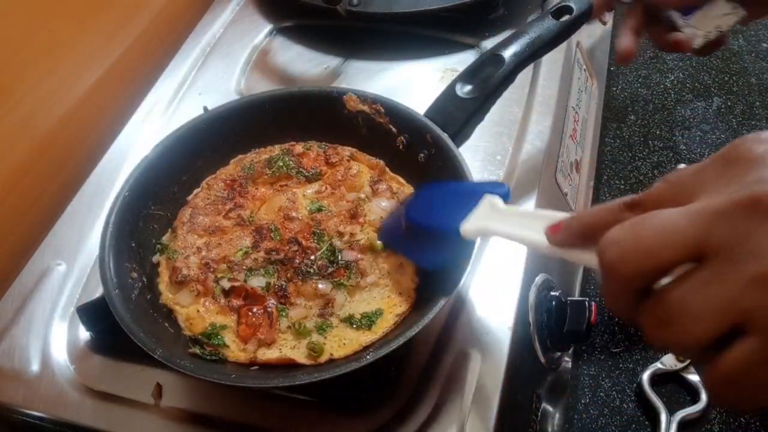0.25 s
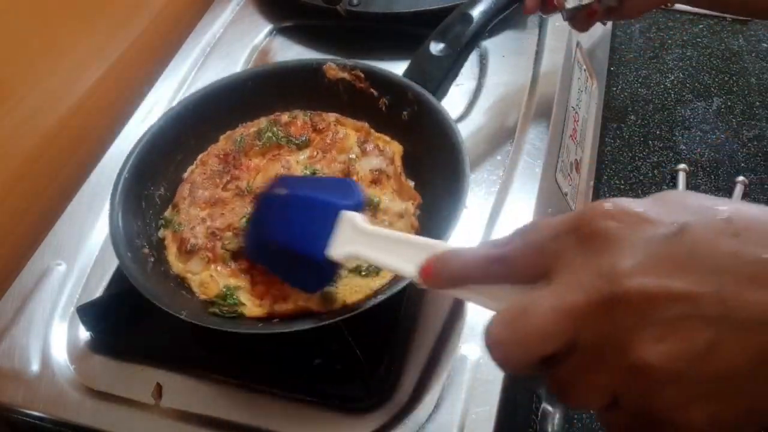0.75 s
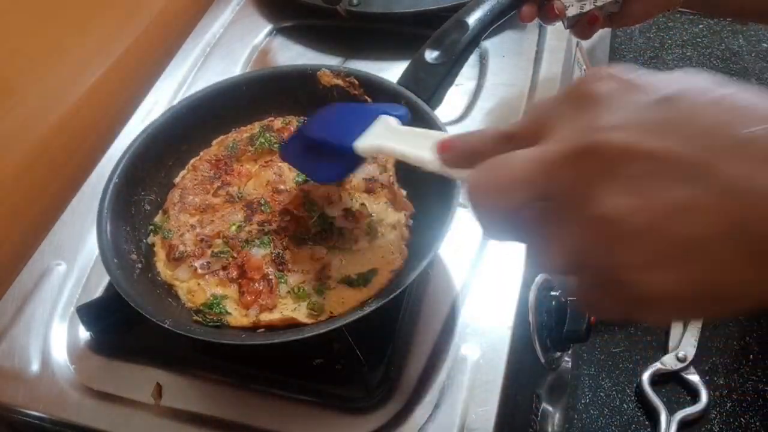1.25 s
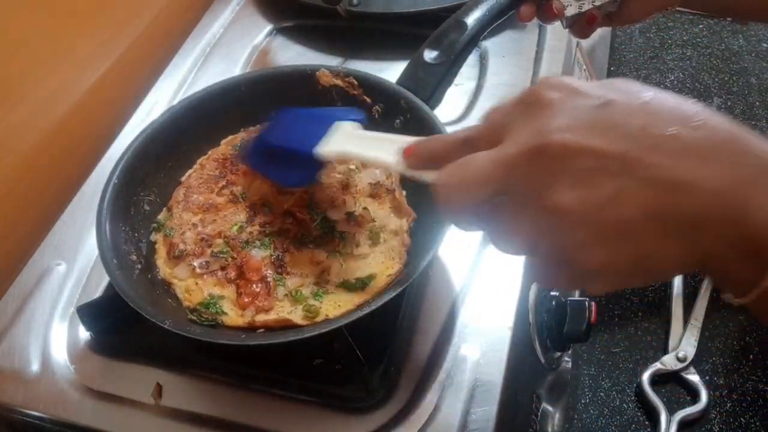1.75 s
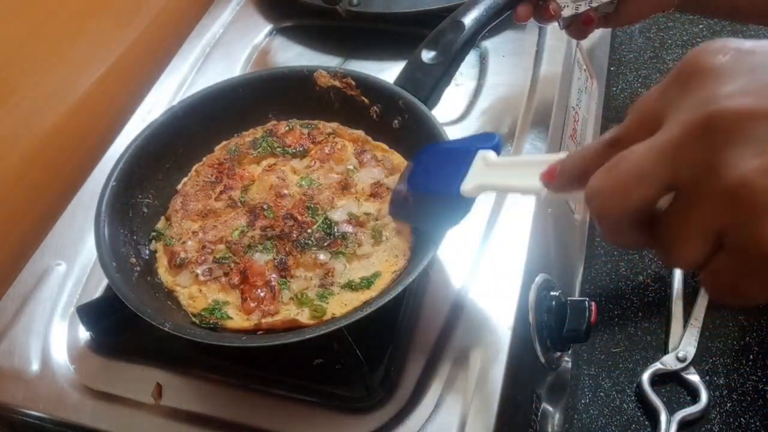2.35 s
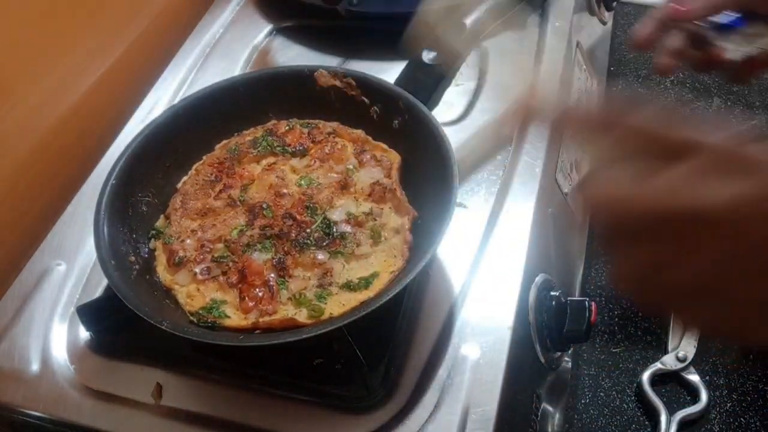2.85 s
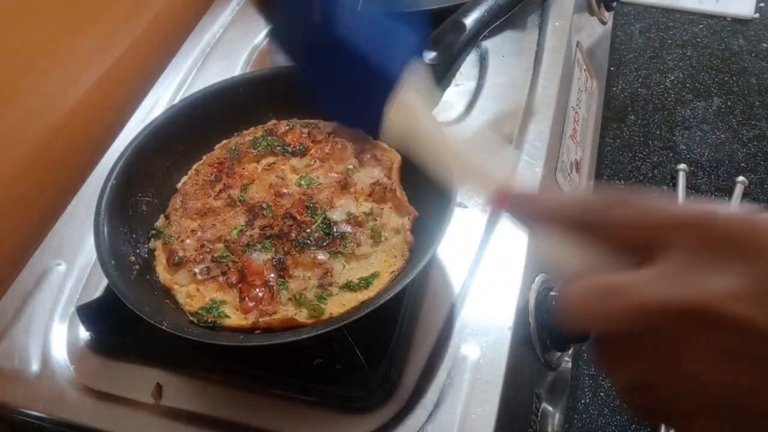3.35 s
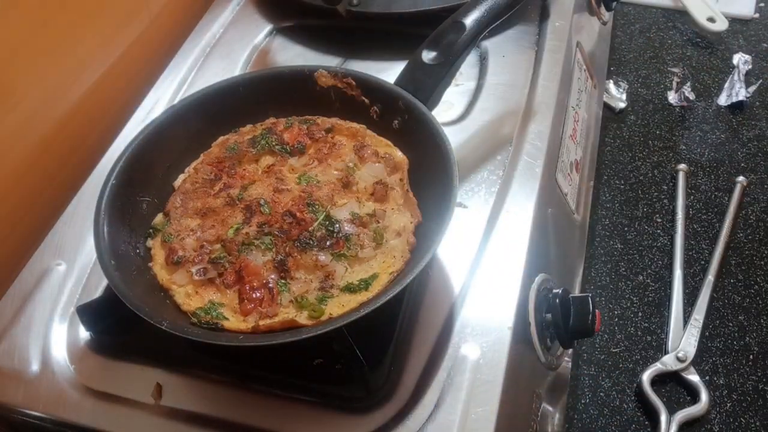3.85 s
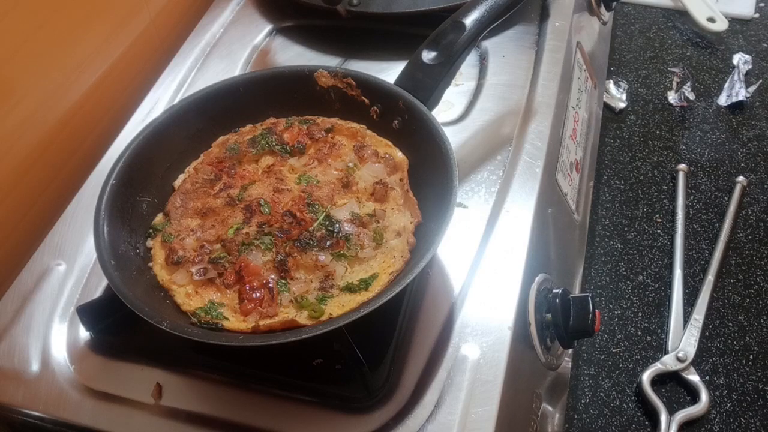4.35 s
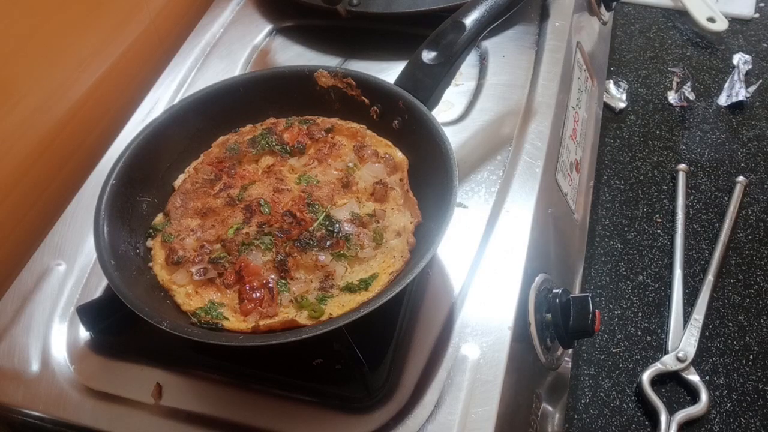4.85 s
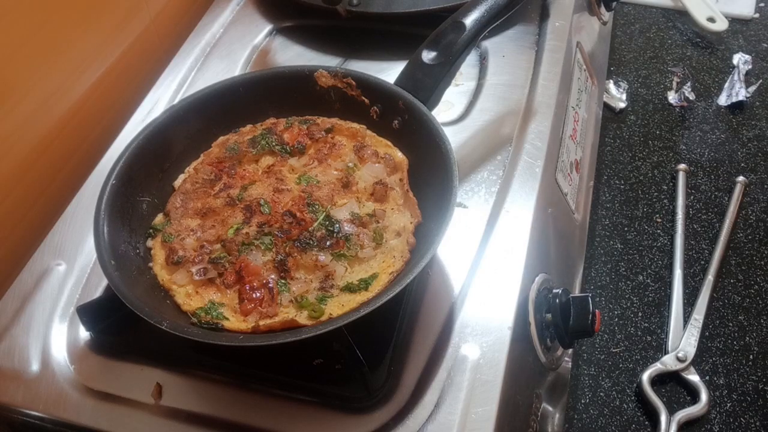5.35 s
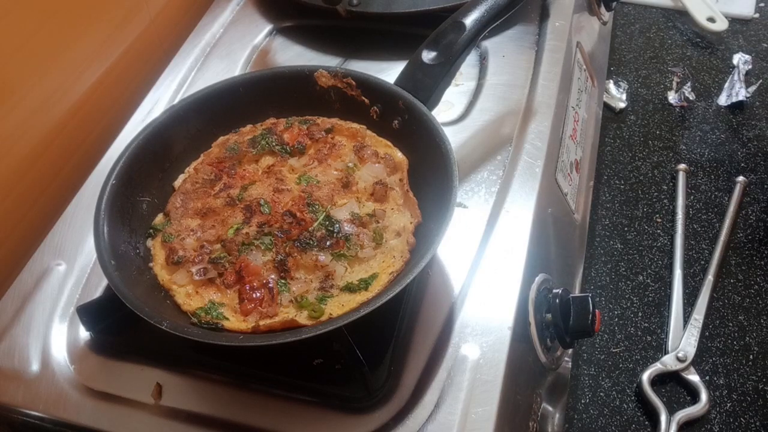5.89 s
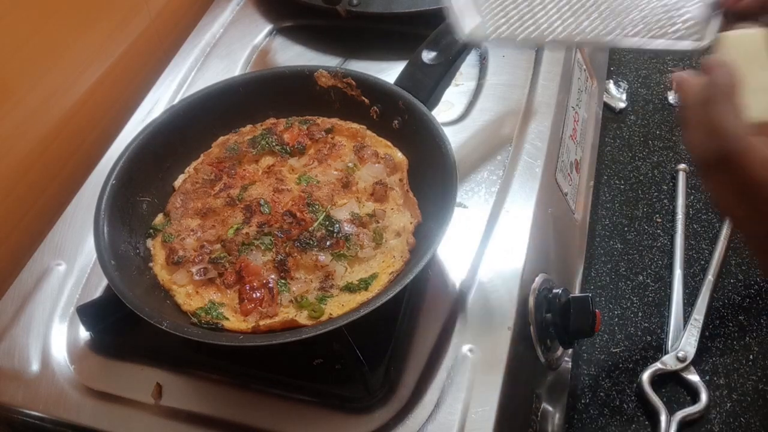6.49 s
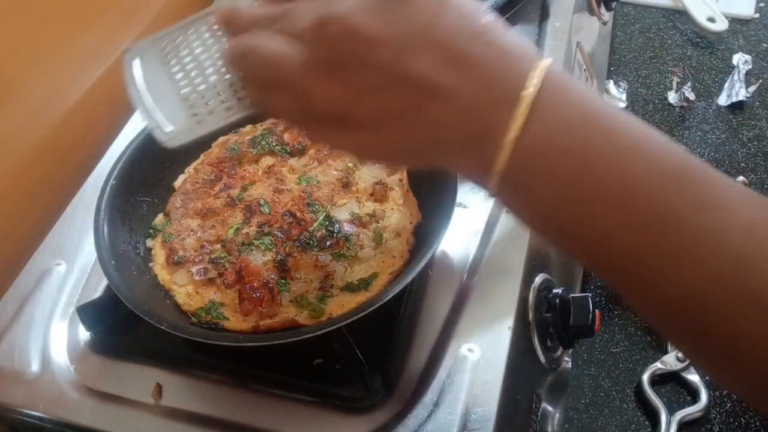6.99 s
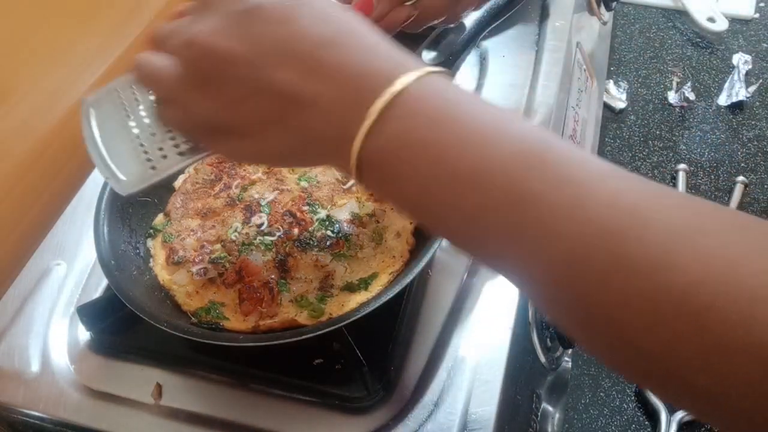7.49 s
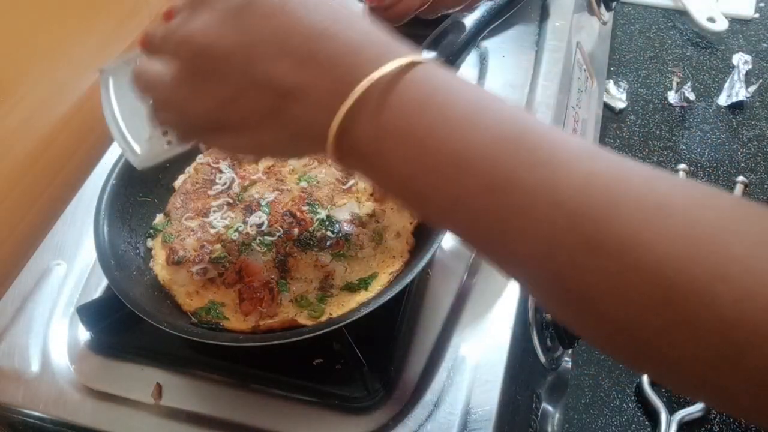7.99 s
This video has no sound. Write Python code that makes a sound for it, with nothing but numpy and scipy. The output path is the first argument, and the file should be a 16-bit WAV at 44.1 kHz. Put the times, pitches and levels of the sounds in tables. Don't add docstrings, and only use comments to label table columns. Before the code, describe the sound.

Soft spatula pats on a pan amid crackling foil, then a drawer scrapes open, cutlery clatters, it thuds shut, and cheese is faintly grated.

```python
import sys
import numpy as np
from scipy import signal
from scipy.fft import rfft, irfft, next_fast_len
from scipy.io import wavfile
from scipy.ndimage import uniform_filter1d

SR = 44100
rng = np.random.default_rng(int(sys.argv[2]) if len(sys.argv) > 2 else 0)


def ratio_of_db(decibels):
    return 10 ** (np.asarray(decibels, float) / 20)


def file_out(sig):
    cols = np.atleast_2d(sig).T
    lim = np.clip(cols, -1, 1)
    pcm = np.round(lim * 32767).astype(np.int16)
    wavfile.write(sys.argv[1], SR, pcm)


N = 362943

# start in seconds, thud in dB, pan ring against it in dB,
# slap against it in dB, t60 in seconds.
PATS = [(0.0, -49, -10.5, 1, 0.12), (0.109, -36.5, 2, 7.5, 0.19), (0.185, -43, -2.5, -9, 0.28),
        (0.256, -35.5, -4, -27, 0.14), (0.448, -27.5, 0.5, 11.5, 0.1), (0.475, -36, 0.5, -7, 0.21),
        (0.579, -53.5, 17, 2, 0.045), (0.657, -30.5, -1.5, -7, 0.19), (0.718, -40.5, 6.5, -6, 0.1),
        (0.829, -63, 14, -20, 0.176), (1.408, -43, 7, 1.5, 0.16), (1.509, -33, 3, 4, 0.13),
        (1.654, -38, 5.5, -7, 0.13), (1.769, -32, 1.5, 2.5, 0.14), (1.876, -47, 0, -17, 0.17),
        (2.704, -43, -6.5, -34, 0.15)]
# frequency in Hz, width in Hz.
PAN_MODES = [(225, 16), (770, 25), (900, 30), (1180, 63), (1330, 19), (1790, 160), (1960, 43), (2300, 200),
             (2760, 41), (3190, 730)]
# frequency in Hz, density in dB per Hz.
PAT_COLOUR = [(35, -63), (60, -30), (225, -0.5), (509, -10), (955, -1.5), (1180, 0.5), (2260, -22),
              (3300, -20.5), (4000, -26.5), (6440, -28), (9000, -40), (11700, -89)]


def spatula_pats():
    out = np.zeros(N)
    t = np.arange(SR // 3) / SR
    for s, db, mid_db, slap_db, t60 in PATS:
        modes = [(hz * rng.uniform(0.9, 1.04), width) for hz, width in PAN_MODES]
        blow = signal.oaconvolve(rng.standard_normal(len(t)), body(PAT_COLOUR, modes, lift_db=6.0))[:len(t)]
        low, mid, high = (evened(part) for part in bands(blow, (600, 2000)))
        rise_s = np.clip(0.003 * ratio_of_db(-slap_db), .001, .012)
        thud = low * ratio_of_db(-60 * t / (1.53 * t60)) * np.minimum(t / (rise_s + 0.0099), 1)
        slap = mid * ratio_of_db(mid_db - 60 * t / t60) + high * ratio_of_db(slap_db - 60 * t / (.5 * t60))
        add(out, s, ratio_of_db(db - 2.5) * (thud + slap * np.minimum(t / rise_s, 1)))
    return out


# peak in seconds, level in dB,
# 20 dB rise in seconds, 20 dB fall in seconds, lean in dB.
DRAGS = [
    (0.682, -41, 0.097, 0.17, 1.5),
    (4.39, -72.5, 0.013, 0.06, 27),
    (4.45, -53.5, 0.073, 0.057, 4.9),
]
# offset in dB, steepness as a factor, share of lean as a factor.
DRAG_LAW = [(-9.5, 0.58, 0.82), (-2, 0.93, 0), (-10.5, 1.7, 0.17)]
# frequency in Hz, density in dB per Hz.
DRAG_COLOUR = [(35, -73.5), (60, -17.5), (160, -15.5), (235, 9), (360, -4), (507, -14.5), (646, -0.5),
               (1190, -9.5), (1800, -32), (2340, -26.5), (3400, -32.5), (4400, -96.5)]


def spatula_drags():
    moves = gestures(DRAGS, DRAG_LAW, (.4, 1.1)) + gestures(DRAGS, DRAG_LAW, (3.8, 5.2))
    return friction(moves, body(DRAG_COLOUR), (500, 1600),
                    per_s=900, spread_db=2.5, hiss=1.2, patchy_db=2.5)


# peak in seconds, level in dB, 20 dB rise in seconds,
# 20 dB fall in seconds, lean in dB.
RUSTLE = [(0.36, -48, -0.93, 1.1, 7), (0.43, -55, -3, 1.55, 12), (1.46, -52.5, 0.66, 0.9, -2),
          (2.07, -53.5, 0.35, 0.4, 5.5), (2.31, -53.5, 0.75, 2, -3), (1.71, -62, -1.04, 1.4, 9.5),
          (3.44, -63.5, 3.5, -1, -9), (3.52, -61.5, 1.4, 1.05, -12), (3.59, -55.5, 0.22, -0.35, 8),
          (3.655, -55, 1.1, -0.24, -3.5), (6.61, -62, 0.3, 0.06, -2), (7.47, -66, 0.02, 1, -5)]
# offset in dB, steepness as a factor, share of lean as a factor.
RUSTLE_LAW = [(-5.5, 7.7, 0.73), (-1.5, 2.7, 0), (-7.5, 1.8, 0)]
# frequency in Hz, density in dB per Hz.
FOIL_COLOUR = [(530, -47.5), (900, -19.5), (1190, -26.5), (1290, -13.5), (1940, -15.5), (2890, -14),
               (3720, -11), (4560, -10.5), (5460, -2.5), (6000, 2.5), (6610, 10.5), (7920, -4), (9260, -19),
               (12800, -19), (15900, -16)]
# time in seconds, level in dB.
SIZZLE = [(0, -59.5), (0.2, -62), (0.7, -61.5), (1.0, -56.5), (2.7, -59.5), (3.0, -59), (3.35, -66),
          (3.66, -66), (3.74, -72.5), (4.4, -68), (5.4, -73.5), (6.4, -78), (7.5, -81.5)]
# offset at -60 dB in dB, share of the level change as a factor.
SIZZLE_BANDS = [(-5, 0.59), (-2.5, 1.1), (-6, 1.1)]
# peak in seconds, level in dB, 20 dB rise in seconds,
# 20 dB fall in seconds, lean in dB.
SWISH = [
    (1.1, -54.5, 0.089, 0.106, 0),
    (1.185, -41.5, 0.15, 0.25, 3.5),
    (1.26, -47, 0.063, 0.16, -5),
    (1.44, -48, 0.071, 0.15, 5.5),
    (2.46, -44.5, 0.1, 0.2, -4.5),
    (3.51, -51, 0.038, 0.13, -12),
    (6.61, -68, .06, 0.069, -1.5),
    (6.718, -59, 0.026, 0.044, -4.5),
]
# offset in dB, steepness as a factor, share of lean as a factor.
SWISH_LAW = [(-6, 2.7, 0.68), (-1, 2, 0.2), (-9.5, 1.5, 0.0036)]
# frequency in Hz, width in Hz.
FOIL_HUMPS = [(1070, 50), (2120, 110), (3400, 350), (5600, 630)]
# peak in seconds, level in dB, top against it in dB.
SNAPS = [(0.1558, -55.5, -11.5), (0.2099, -41, -10), (0.2214, -42, -11), (0.249, -42, -11),
         (0.2744, -36, -21), (0.3689, -24, -29), (0.419, -37, -8), (0.5477, -48, -26.5), (0.593, -34, -17),
         (0.6454, -34, -25), (0.75, -42, -22), (0.825, -42, -25), (0.8565, -46, -28), (0.88, -30.5, -15),
         (1.0545, -48, -17), (1.0983, -40, -15), (1.1357, -28, -17), (1.1568, -35, -22.5),
         (1.1823, -29, -24.5), (1.1994, -36, -19), (1.2206, -32, -18), (1.2551, -23.5, -26),
         (1.263, -20, -23), (1.285, -36, -14), (1.2943, -30, -11), (1.3468, -39.5, -19),
         (1.4544, -32.5, -20), (1.5449, -29, -27), (1.5893, -41, -23), (1.7055, -43.5, -11),
         (1.7419, -33, -13), (1.8961, -37, -24), (2.0522, -50, -14), (2.16, -42, -20.5), (2.2449, -23, -36),
         (2.2929, -38, -23), (2.3024, -36, -23), (2.3118, -33, -20), (2.3481, -36, -18), (2.4066, -31, -25),
         (2.448, -27, -16), (2.464, -33, -17.5), (2.4773, -34, -18), (2.491, -27, -24), (2.5203, -40, -29),
         (2.5807, -33, -27), (2.6284, -31.5, -27), (2.6719, -31.5, -7.5), (2.7138, -36.5, -26),
         (2.7841, -30, -30.5), (2.8698, -36.5, -17), (2.9053, -40.5, -6), (3.073, -42, -9),
         (3.2715, -47, -2), (3.2946, -40.5, -19), (3.4231, -52, -4), (3.437, -39, -14), (3.4874, -42.5, -2),
         (3.5064, -43, -4), (3.5824, -39, -11.5)]
# peak in seconds, level in dB, top against it in dB.
TICKS = [
    (4.324, -57.5, -3),
    (3.965, -58.5, -10.5),
    (6.707, -53, -16.5),
    (6.716, -46.5, -17),
    (6.732, -52.5, -15),
    (7.035, -61, -16),
]


def foil_wrapper():
    bed = friction(gestures(RUSTLE, RUSTLE_LAW, (0, 7.5), (SIZZLE, SIZZLE_BANDS)),
                   body(FOIL_COLOUR, HUM[4:], lift_db=-1.0), (4500, 9000),
                   per_s=1900, spread_db=3.4, hiss=.8, patchy_db=1.2)
    swish = friction(gestures(SWISH, SWISH_LAW, (0, 7.5)),
                     body(FOIL_COLOUR, FOIL_HUMPS, lift_db=10), (4500, 9000),
                     per_s=1500, spread_db=3.6, hiss=.9, patchy_db=2)
    grip = wander(N, 900, 900)
    crackle = flicker((bed + swish) * ratio_of_db(.8 * grip))
    return crackle + snaps(SNAPS + TICKS, FOIL_COLOUR, FOIL_HUMPS[1:], lift_db=4)


# peak in seconds, level in dB, 20 dB rise in seconds,
# 20 dB fall in seconds, lean in dB.
DRAWER = [(3.59, -49, 0.012, 0.15, -11), (3.915, -47.5, 0.019, 0.17, 2), (3.98, -39, 0.069, 0.26, 5),
          (4.085, -34.5, 0.2, 0.085, -4.5), (4.135, -39, 0.015, 0.092, 9.5), (4.19, -42.5, 0.05, 0.13, -1),
          (5.569, -31, 0.012, 0.2, 2.5), (5.64, -33.5, 0.076, 0.28, -3.5), (5.74, -31.5, 0.14, 0.16, 3),
          (5.83, -36, 0.097, .13, -1), (5.93, -39, 0.12, 0.11, -16.5), (5.985, -44.5, 0.032, 0.095, -1.5),
          (6.29, -58.5, 0.056, 0.045, -8)]
# offset in dB, steepness as a factor, share of lean as a factor.
DRAWER_LAW = [(-0.5, 1.4, 0.24), (-5, 1.262, 1)]
# frequency in Hz, density in dB per Hz.
DRAWER_COLOUR = [(24, -64.5), (40, -45.5), (83, -1), (140, -2.5), (180, -6), (297, -6.5), (541, -16),
                 (987, -17), (1180, -10.5), (1850, -22.5), (6620, -25), (9400, -49.5), (15900, -53.5)]
# frequency in Hz, width in Hz.
BOX_MODES = [(130, 71), (355, 40), (1176, 27), (2406, 44), (2750, 36), (3190, 33)]


def drawer_slide():
    opening = gestures(DRAWER, DRAWER_LAW + [(-22, 1.5, .5)], (3.5, 4.5))
    shutting = gestures(DRAWER, DRAWER_LAW + [(-15.5, 1.2, .8)], (5.4, 6.5))
    return friction(opening + shutting, body(DRAWER_COLOUR, BOX_MODES, lift_db=-4.5), (600, 3500, 11800),
                    per_s=1000, spread_db=3.0, hiss=1.33, patchy_db=3.0, air_db=-22.0)


# peak in seconds, level in dB, 20 dB rise in seconds,
# 20 dB fall in seconds, lean in dB.
CUTLERY = [(4.03, -49.5, 0.02, 0.134, -16), (4.092, -48.5, .009, 0.061, -25),
           (4.135, -38, 0.013, 0.11, -21.5), (4.487, -36.5, 0.0176, 0.124, 1.5),
           (4.556, -31.5, .012, 0.21, -5.5), (4.607, -30.5, 0.022, 0.32, -2),
           (4.71, -30, 0.0315, 0.067, -8), (4.792, -25, 0.016, 0.11, -7.5), (4.85, -26, 0.075, 0.099, -6),
           (4.902, -32.5, .05, 0.028, -6.5), (4.94, -47.5, 0.063, 0.11, -4.5)]
# offset in dB, steepness as a factor, share of lean as a factor.
CUTLERY_LAW = [(-3, 1, 0.73), (-0.1, 1, 1.13), (0.57, 0.96, 0.1)]
# frequency in Hz, density in dB per Hz.
CUTLERY_COLOUR = [(24, -48), (40, -33.5), (96, 3.5), (231, -5.5), (353, -3.5), (541, -8), (1060, -9),
                  (1240, -7.5), (1760, -12), (3370, -11), (4660, -13), (5690, -11), (7130, -11),
                  (9400, -31.5), (15900, -16)]
# frequency in Hz, width in Hz.
STEEL_MODES = [(353, 38), (1270, 14), (1906, 10), (2384, 14), (3004, 8.3), (3377, 21), (3837, 25),
               (4087, 21), (4400, 42), (4914, 21), (5344, 13), (5650, 66), (6156, 26), (6650, 48)]


def cutlery_clash():
    return friction(gestures(CUTLERY, CUTLERY_LAW, (3.8, 5.2)),
                    body(CUTLERY_COLOUR, STEEL_MODES, lift_db=9), (700, 3000, 11800),
                    per_s=2000, spread_db=1.5, hiss=1.08, patchy_db=2.0, air_db=-13.5)


# peak in seconds, level in dB, 20 dB rise in seconds,
# 20 dB fall in seconds, lean in dB.
NUDGES = [
    (5.165, -50, 0.038, 0.12, -18.5),
    (5.235, -65, 0.15, 0.16, 9),
]
# offset in dB, steepness as a factor, share of lean as a factor.
NUDGE_LAW = [(4, 1.4, 0), (-19, 1.7, 0.69), (-2, 1.4, 1), (1.5, 1.1, 0.46)]


def drawer_nudge():
    return friction(gestures(NUDGES, NUDGE_LAW, (5.1, 5.5)),
                    body(CUTLERY_COLOUR, STEEL_MODES[3:], lift_db=8), (250, 750, 3500, 9000),
                    per_s=900, spread_db=2.5, hiss=1.3, patchy_db=5, air_db=-25)


# start in seconds, level in dB, frequency in Hz, t60 in seconds.
KNOCKS = [(4.134, -42, 1160, 0.12), (4.477, -23.5, 869, 0.107), (4.707, -23, 3810, 0.11),
          (4.787, -20.5, 3373, 0.1), (4.819, -20, 5710, 0.1), (4.852, -20, 6180, 0.11),
          (4.552, -38.5, 14100, .12), (4.553, -41.5, 7100, .15), (4.554, -35, 9350, .06),
          (4.555, -47.5, 10100, 0.074), (4.556, -41, 11700, .07), (4.604, -26.5, 5900, .06),
          (4.64, -28, 1267, .2), (4.72, -28, 1260, 0.23), (4.79, -23.5, 1244, .12), (4.82, -20, 2366, .06),
          (4.875, -40, 11000, .1), (4.16, -35.5, 2850, 0.12)]
# start in seconds, level in dB, frequency in Hz, t60 in seconds.
BOOMS = [
    (3.991, -35, 348.7, 0.45),
    (4.131, -22, 360.5, 0.158),
    (4.071, -28, 140, 0.36),
    (4.602, -22.5, 347.4, 0.27),
    (5.153, -30, 140, 0.12),
    (5.561, -17.5, 357, 0.083),
    (5.726, -14, 144.5, 0.24),
    (5.799, -12, 114, 0.12),
    (5.88, -23, 136, 0.32),
]


def drawer_knocks(size=12000):
    out, t = np.zeros(N), np.arange(size) / SR
    for s, db, hz, t60 in KNOCKS + BOOMS:
        pair = np.sin(2 * np.pi * hz * t) + .4 * np.sin(2 * np.pi * hz * 1.04 * t)
        rise = np.minimum(t * hz / 6.9, 1)
        add(out, s, ratio_of_db(db - 1.0 - 60 * t / t60) * pair * rise)
    return out


# peak in seconds, level in dB, 20 dB rise in seconds,
# 20 dB fall in seconds, lean in dB.
GRATING = [
    (7.575, -59.5, 0.028, .15, -3.5),
    (7.64, -61.5, .1, .3, 0.5),
    (7.79, -61.5, 0.13, 0.24, -1.5),
    (7.85, -57.5, 0.047, 0.078, 9.5),
    (7.92, -64, 0.11, 0.44, -7),
    (8.01, -58.5, 0.25, 0.24, 0.5),
    (8.105, -52, 0.026, 0.24, 5.5),
    (8.19, -54, .2, .5, 2.5),
]
# offset in dB, steepness as a factor, share of lean as a factor.
GRATING_LAW = [(-4, 2.3, 0.8), (-4, 0.87, -0.53), (-7.5, 0.64, -0.51)]
# frequency in Hz, density in dB per Hz.
GRATING_COLOUR = [(410, -51), (700, -46), (958, -19), (1290, -25.5), (1640, -21), (2130, -26), (2520, -14),
                  (3730, -14), (6620, -1.5), (9430, -15), (14100, -12), (15900, -10.5)]
PLATE_HZ = [1710, 2200, 2816, 3180, 3455, 3810, 4180, 4600, 5150, 5300, 6000, 6400, 6850, 7700]
# peak in seconds, level in dB, top against it in dB.
CATCHES = [(7.4844, -47, -8.5), (7.5033, -45.5, -11), (7.5477, -56, -12), (7.5667, -35.5, -27),
           (7.5951, -40, -26), (7.6196, -51, -21.5), (7.6286, -39, -22), (7.6475, -47.5, -23.5),
           (7.6944, -46, -25), (7.7727, -44.5, -19), (7.8116, -39, -11), (7.8416, -28.5, -30.5),
           (7.8624, -44, -20.5), (7.894, -40, -23.5), (7.9054, -38, -25), (7.9234, -48, -13.5),
           (7.9453, -40, -21), (7.9758, -38, -23), (7.9814, -47, -16), (7.9912, -45, -9),
           (8.0052, -31.5, -15), (8.0551, -40.5, -17), (8.0691, -38, -14.5), (8.098, -27.5, -24),
           (8.1107, -33, -15.5), (8.1154, -37, -20), (8.1204, -42, -12), (8.1364, -32, -21),
           (8.1434, -29, -19), (8.1474, -31, -19), (8.1524, -40, -21), (8.1664, -34, -25),
           (8.1764, -38.5, -22.5), (8.1873, -37, -24.5), (8.2072, -32, -28.5), (8.2184, -29.5, -26.5)]


def grater():
    modes = [(hz, 40) for hz in PLATE_HZ]
    bed = friction(gestures(GRATING, GRATING_LAW, (7.4, 8.24)),
                   body(GRATING_COLOUR, modes, lift_db=15), (4500, 9000),
                   per_s=1000, spread_db=3.1, hiss=.6, patchy_db=2)
    return bed + snaps(CATCHES, GRATING_COLOUR, modes, lift_db=11.0)


# start in seconds, level in dB, frequency in Hz,
# length in seconds.
RINGS = [(0.011, -53, 2600, 0.069), (0.168, -52.5, 2600, 0.049), (0.286, -52, 2558, 0.052),
         (2.054, -62.5, 729.4, 0.053), (2.344, -57, 2820, 0.035), (2.365, -57, 242.6, 0.075),
         (3.753, -67, 679.6, 0.057), (5.035, -56, 2900, 0.073), (5.167, -57, 977.7, 0.048),
         (5.194, -57.5, 2810, 0.069), (5.01, -79.5, 4500, 0.087), (5.166, -57, 4500, .1),
         (5.25, -74, 3000, 0.15), (5.441, -68.5, 900, .04), (8.2, -67.5, 950, 0.028),
         (5.299, -67, 971.5, 0.063), (6.28, -66, 2176, 0.023), (6.291, -68.5, 2455, 0.03),
         (6.574, -67, 3455, 0.064), (6.596, -68.5, 3625, .06), (6.587, -66, 6393, .06),
         (6.61, -73, 5468, 0.067), (6.703, -69, 4653, .045), (6.71, -70, 5499, .025),
         (6.712, -67, 6500, 0.04), (6.871, -72, 2800, .06), (7.004, -71.5, 2800, .055),
         (7.209, -70, 5900, .035), (7.3, -71, 6500, .06), (7.03, -71, 7765, 0.022),
         (2.706, -50.5, 892.8, 0.039), (6.7, -71, 1293, 0.044), (7.261, -70.5, 3860, 0.07),
         (7.965, -70.5, 1048, 0.1)]


def faint_rings():
    out = np.zeros(N)
    for s, db, hz, length in RINGS:
        t = np.arange(0, length, 1 / SR)
        waver = wander(len(t), 300)
        phase = 2 * np.pi * np.cumsum(hz + (9 + .005 * hz) * waver) / SR
        tone = np.sin(phase) * ratio_of_db(1.5 * waver[::-1])
        add(out, s, ratio_of_db(db) * tone * signal.windows.tukey(len(t), .6))
    return out


# frequency in Hz, density in dB per Hz.
FLOOR_COLOUR = [(15, -40.5), (25, -15), (102, 2.5), (248, 1), (529, -7.5), (1290, -10), (5900, -19.5),
                (6520, -11.5), (7260, -25), (7880, -10.5), (9260, -25), (12500, -17), (15900, -28.5)]
# frequency in Hz, width in Hz.
HUM = [(6600, 219.7), (6900, 120), (286, 9.2), (1293, 12), (6900, 2000)]


def kitchen():
    hush = signal.oaconvolve(rng.standard_normal(N), body(FLOOR_COLOUR, HUM, lift_db=11))[:N]
    return ratio_of_db(-71) * evened(patches(hush, patchy_db=2.5))


def room(x, t60=0.16):
    t = np.arange(SR // 3) / SR
    echoes = rng.choice([-1., 1.], len(t)) * (rng.random(len(t)) < 2000 / SR)
    tail = echoes * ratio_of_db(-60 * t / t60) * (t > .004)
    return signal.oaconvolve(x, tail / np.linalg.norm(tail))[:N]


def gestures(rows, law, span, bed=None):
    t = np.arange(*span, .004)
    s, db, rise, fall, lean = np.transpose(rows)[:, :, None]
    down = 20 * np.maximum((s - t) / abs(rise), (t - s) / abs(fall)) ** 1.476
    power = np.array([ratio_of_db(2 * (db + offset - steep * down + share * lean)).sum(0)
                      for offset, steep, share in law])
    if bed:
        levels, bed_bands = bed
        change = np.interp(t, *np.transpose(levels)) + 60
        power = power + [ratio_of_db(2 * (offset + share * change - 60)) for offset, share in bed_bands]
    return [np.transpose([t, *(10 * np.log10(power + 1e-30))])]


def friction(tables, response, edges_hz, per_s, spread_db, hiss, patchy_db, air_db=None):
    out = np.zeros(N)
    for rows in tables:
        s, *columns = np.transpose(rows)
        if air_db is not None:
            columns.append(columns[-1] + air_db)
        t = np.arange(s[0], s[-1], 1 / SR)
        noise = rng.standard_normal(len(t))
        sizes = ratio_of_db(spread_db * np.minimum(rng.exponential(1, len(t)), 4))
        slips = (rng.random(len(t)) < per_s / SR) * sizes * np.sign(noise)
        driven = signal.oaconvolve(evened(slips) + hiss * noise, response)[:len(t)]
        parts = bands(patches(driven, patchy_db), edges_hz)
        mix = sum(ratio_of_db(np.interp(t, s, db)) * evened(part) for db, part in zip(columns, parts))
        add(out, s[0], mix * signal.windows.tukey(len(t), .02 * SR / len(t)))
    return out


def snaps(rows, colour, peaks, lift_db, size=2000):
    out, t = np.zeros(N), np.arange(size) / SR
    shape = np.exp(-((t - .0005) / .00022) ** 2) + ratio_of_db(-24 - 60 * t / .04)
    crack = 2.5 * signal.unit_impulse(size, idx=20)
    flat = [(hz, .6 * db) for hz, db in colour]
    for s, db, top_db in rows:
        spot = [(hz * rng.uniform(.95, 1.05), width) for hz, width in peaks]
        tear = shape * rng.standard_normal(size) + crack
        click = signal.oaconvolve(tear, body(flat, spot, lift_db, size=2048))[:size]
        main, top = (part / abs(part).max() for part in bands(click, (1400, 9000))[1:])
        add(out, s, ratio_of_db(db) * (main + ratio_of_db(top_db + 9.5) * top))
    return out


def flicker(x, top_db=2.5, edge_hz=9200):
    low, top = bands(x, (edge_hz,))
    return low + top * ratio_of_db(top_db * wander(N, 700, 700) + 0.04)


def patches(x, patchy_db):
    z = signal.stft(x, nperseg=512)[2]
    field = rng.standard_normal(z.shape[::-1]).T
    field = uniform_filter1d(uniform_filter1d(field, size=4, axis=0), size=10, axis=1)
    return signal.istft(z * ratio_of_db(patchy_db * evened(field)), nperseg=512)[1][:len(x)]


def body(colour, peaks=(), lift_db=0, size=4096):
    hz = np.abs(np.fft.fftfreq(size, 1 / SR))
    humps = sum(1 / (1 + (2 * (hz - f) / width) ** 2) for f, width in peaks)
    gain = ratio_of_db(np.maximum(read(colour, hz), -90)) * np.sqrt(1 + ratio_of_db(2 * lift_db) * humps)
    return np.fft.ifft(np.exp(np.conj(signal.hilbert(np.log(gain))))).real[:size // 2]


def bands(x, edges_hz):
    size = next_fast_len(len(x), True)
    hz, z = np.fft.rfftfreq(size, 1 / SR), rfft(x, size)
    below = [0] + [1 / (1 + (hz / f) ** 12) for f in edges_hz] + [1]
    return [irfft(z * (b - a), size)[:len(x)] for a, b in zip(below, below[1:])]


def read(points, hz):
    f, value = np.transpose(points)
    return np.interp(np.log(hz + 1), np.log(f + 1), value)


def wander(count, *sizes):
    x = rng.standard_normal(count)
    for size in sizes:
        x = uniform_filter1d(x, size=size)
    return evened(x)


def evened(x):
    return x / np.sqrt(np.mean(x ** 2) + 1e-20)


def add(mix, s, sound):
    part = mix[max(round(s * SR), 0):][:len(sound)]
    part += sound[:len(part)]


def scene():
    drawer = drawer_slide() + drawer_nudge() + cutlery_clash() + drawer_knocks()
    near = spatula_pats() + spatula_drags() + drawer + faint_rings()
    hush = ratio_of_db(5.5) * flicker(kitchen())
    return np.tile(near + ratio_of_db(-9.5) * room(near) + foil_wrapper() + grater() + hush, (2, 1))


def gate(x, over_db=4, depth_db=5):
    z = signal.stft(x, nperseg=512, noverlap=384)[2]
    power = uniform_filter1d(uniform_filter1d(abs(z) ** 2, size=9, axis=1), size=3, axis=0) + 1e-20
    floor = ratio_of_db(2 * over_db) * np.percentile(power, 15, axis=1)[:, None]
    keep = np.sqrt(np.maximum(1 - floor / power, ratio_of_db(-2 * depth_db)))
    return signal.istft(z * keep, nperseg=512, noverlap=384)[1][:len(x)]


def low_pass(x):
    return signal.sosfilt(signal.butter(12, 16510, fs=SR, output="sos"), x)


# frequency in Hz, gain in dB.
PORT = [(8000, -0.77), (9000, -2.5), (9350, -6.5), (9800, -3), (11100, -4.5), (11600, -5.5), (12200, 2.5)]
# frequency in Hz, side against mid in dB.
WIDTH = [(60, -73), (2380, -67.5), (4400, -35.5), (7400, -36), (8800, -10.5), (11400, -8), (12600, -19),
         (15000, -18.5)]


def record(dry):
    mid = signal.sosfilt(signal.butter(3, 22, "high", fs=SR, output="sos"), dry[0])
    mid = signal.oaconvolve(mid, signal.firwin(511, 15700, window=("kaiser", 9), fs=SR), "same")
    mid = gate(signal.oaconvolve(mid, body(PORT, size=512))[:N])
    smear = rng.standard_normal(300) / np.sqrt(300)
    side = signal.oaconvolve(mid, np.convolve(smear, body(WIDTH, size=512)))[:N]
    return low_pass(mid + side * np.array([[1], [-1]]))


dry = scene()
out = record(dry)
file_out(out)
```